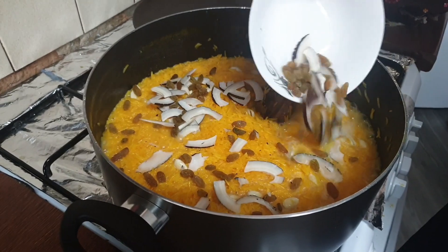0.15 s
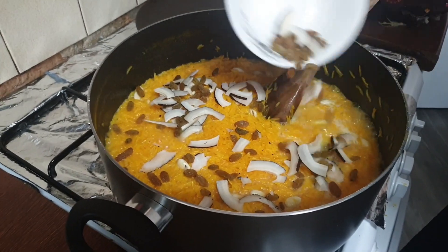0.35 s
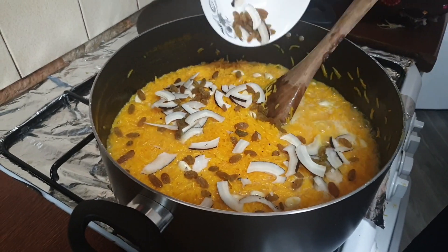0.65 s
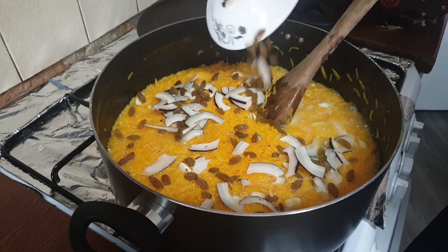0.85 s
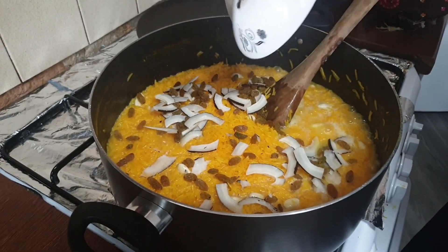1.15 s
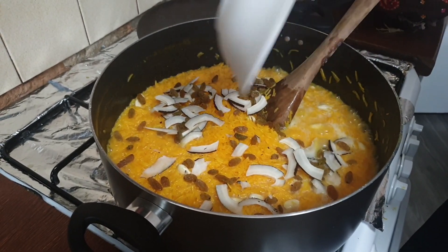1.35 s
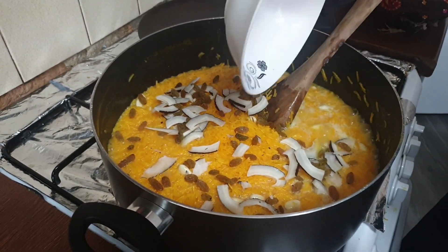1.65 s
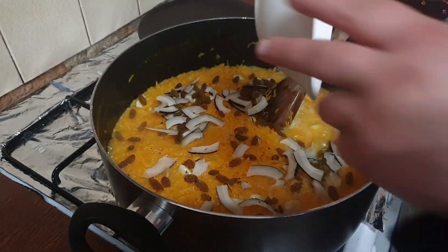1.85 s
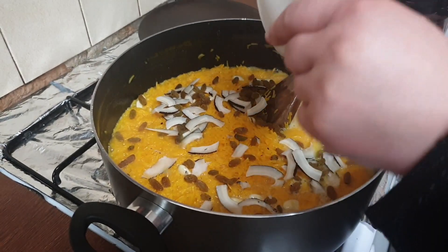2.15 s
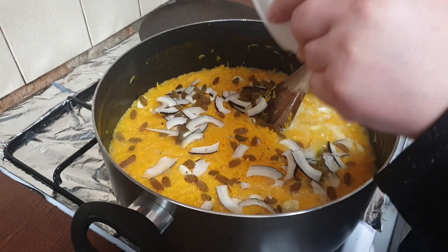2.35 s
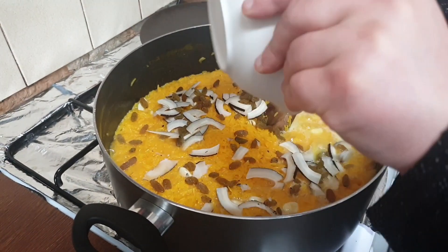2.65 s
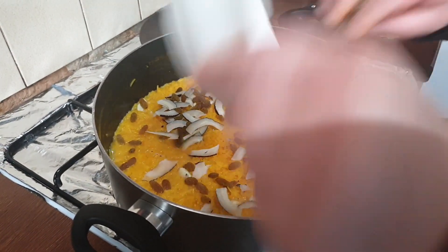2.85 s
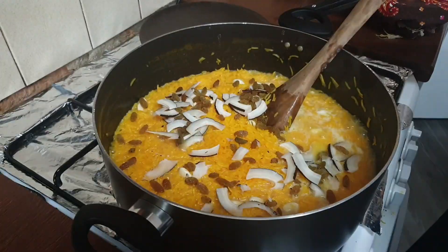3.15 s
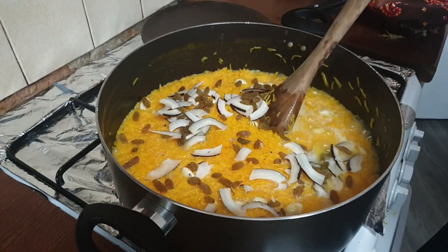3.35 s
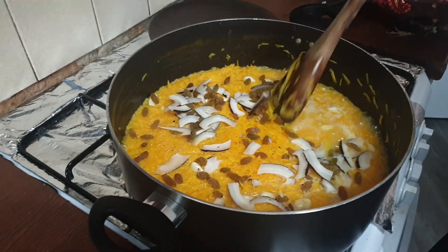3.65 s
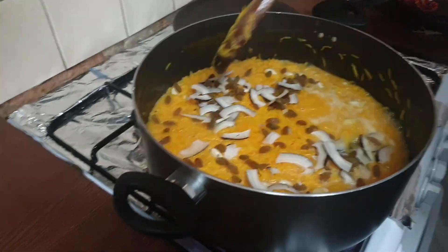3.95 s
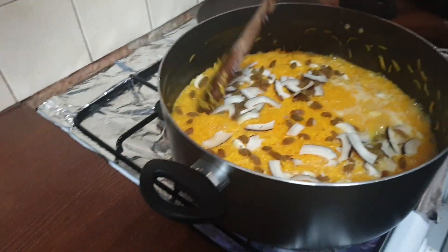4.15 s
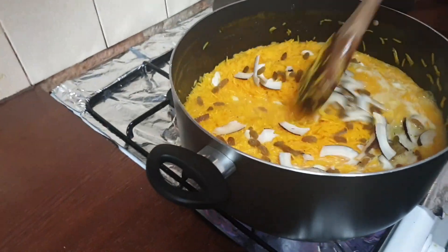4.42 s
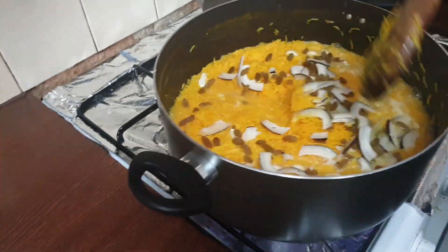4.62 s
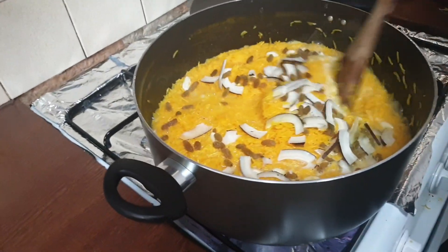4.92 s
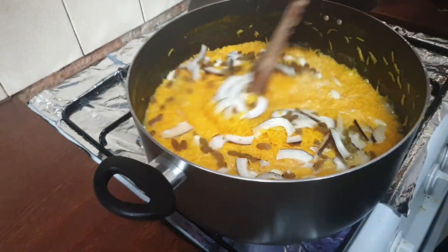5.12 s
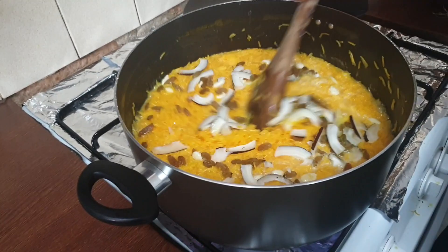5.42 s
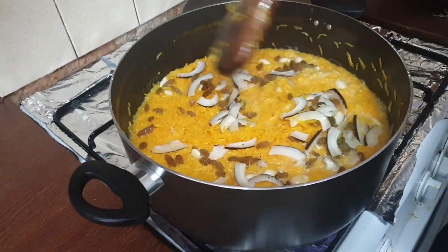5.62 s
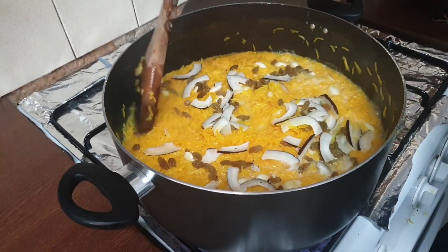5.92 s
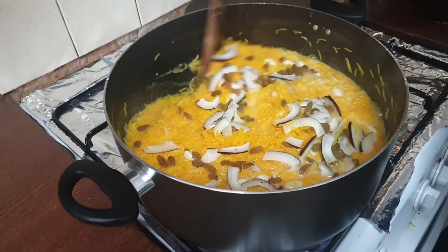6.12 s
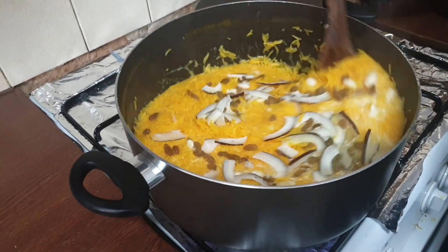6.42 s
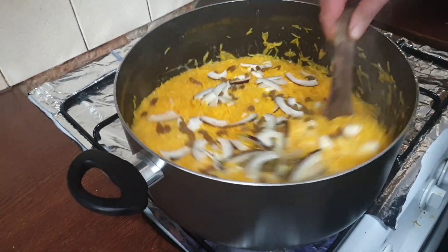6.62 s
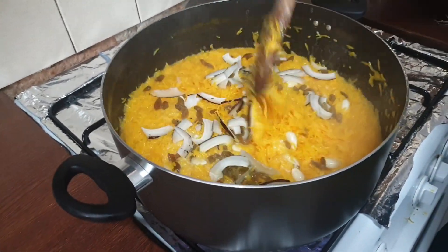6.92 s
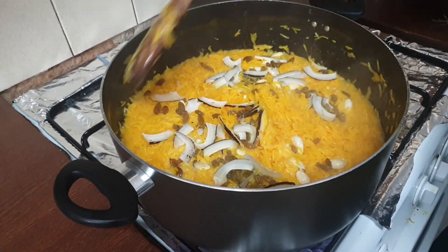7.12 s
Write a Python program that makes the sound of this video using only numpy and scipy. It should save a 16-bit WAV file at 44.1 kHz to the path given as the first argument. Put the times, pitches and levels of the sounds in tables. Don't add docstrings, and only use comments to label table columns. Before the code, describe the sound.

A close stereo microphone hears a pot of rice bubbling steadily, with rounded plops and crisp spitting above a soft flame rumble. After four seconds a wooden spoon cracks against the ringing metal, pushes through the wet rice, thuds the pot on its grate and scrapes it. Later strokes turn mushy and crunchy, then simmering remains. Short kitchen echoes.

```python
import sys
import numpy as np
from scipy import signal
from scipy.fft import rfft, irfft
from scipy.io import wavfile
from scipy.ndimage import uniform_filter1d

SR = 44100
rng = np.random.default_rng(int(sys.argv[2]) if len(sys.argv) > 2 else 0)


def voltage_ratio(decibels):
    exponent = np.asarray(decibels, float) / 20
    return 10 ** exponent


def waveform_to_disk(signal):
    frames = np.transpose(np.atleast_2d(signal))
    scaled = np.clip(frames, -1, 1) * 32767
    samples = np.round(scaled).astype(np.int16)
    wavfile.write(sys.argv[1], SR, samples)


N = 320871
T = np.arange(N) / SR


def evened(x):
    return x / np.sqrt(np.mean(x ** 2) + 1e-20)


def read(points, hz):
    point_hz, value = np.transpose(points)
    return np.interp(np.log(hz + 1), np.log(point_hz + 1), value)


def add(mix, s, sound):
    part = mix[round(s * SR):][:len(sound)]
    part += sound[:len(part)]


def coloured(x, points):
    gain_db = np.maximum(read(points, abs(np.fft.fftfreq(4096, 1 / SR))), -90)
    log_gain = np.log(voltage_ratio(gain_db))
    min_phase = np.exp(np.conj(signal.hilbert(log_gain)))
    taps = np.fft.ifft(min_phase).real[:2048]
    return signal.oaconvolve(x, taps / np.linalg.norm(taps))[:len(x)]


def resonate(x, hz, width_hz):
    turn = np.exp(2j * np.pi * np.cumsum(hz * np.ones(len(x))) / SR)
    r = np.exp(-np.pi * width_hz / SR)
    smooth = signal.lfilter([1 - r], [1, -r], x / turn)
    return 2 * (turn * smooth).real


def grains(per_s, spread_db):
    sign = np.sign(rng.standard_normal(N))
    size_db = spread_db * np.minimum(rng.exponential(1, N), 4)
    hit = rng.random(N) < per_s / SR
    return evened(sign * voltage_ratio(size_db) * hit)


LEAD_S = 0.00019


def lag(hz):
    return np.exp(-1j * np.minimum(2 * np.pi * LEAD_S * hz, np.pi / 2))


# frequency in Hz, left-right likeness 0-1.
LIKENESS = [(60, 0.95), (130, 0.94), (290, 1), (640, 0.67), (1410, 0.51), (3100, 0.4), (6820, 0.14),
            (15000, 0.18)]


def wash(points, patchy_db, flicker_db, size):
    frames, hz = 4 * N // size + 5, np.fft.rfftfreq(size, 1 / SR)
    a, b, c, d, patches = rng.standard_normal((frames, len(hz), 5)).T
    patches = evened(uniform_filter1d(uniform_filter1d(patches, 8, 0), 10, 1))
    flicker = evened(uniform_filter1d(rng.exponential(1, frames) - 1, 3))
    same = np.clip(read(LIKENESS, hz), 0, 1)[:, None]
    left = a + 1j * b
    right = (same * left + np.sqrt(1 - same ** 2) * (c + 1j * d)) * lag(hz)[:, None]
    level_db = read(points, hz)[:, None] + patchy_db * patches + flicker_db * flicker
    z = np.array([left, right]) * voltage_ratio(level_db)
    return evened(signal.istft(z, nperseg=size, noverlap=3 * size // 4)[1][:, :N])


# resonance in Hz, width in Hz, level in dB.
BOWL_MODES = [(310, 24, 2), (569, 53, -3.5), (876, 79, -1), (1288, 82, -2)]


def bowl(x):
    ring = sum(voltage_ratio(db) * resonate(x, hz, width_hz) for hz, width_hz, db in BOWL_MODES)
    return evened(x + ring) * np.std(x)


# frequency in Hz, level in dB per Hz.
FIZZ_SPECTRUM = [(1470, -25), (2500, -4.5), (3410, -8), (5480, -6.5), (6600, -17.5), (7130, -15),
                 (7770, -24), (8140, -23), (8730, -14), (10600, -4), (14000, -3.5), (15000, -5),
                 (16000, -40)]
# frequency in Hz, level in dB.
GURGLE_SPECTRUM = [(150, -23), (300, -2), (550, -1), (900, -4), (1500, -8), (2400, -8), (3200, -19.5),
                   (5000, -33)]
# frequency in Hz, level in dB.
RUMBLE_SPECTRUM = [(25, -45), (36, -32), (52, 5), (80, 1.5), (150, 0.5), (250, -6.5), (400, -11),
                   (800, -45)]
# time in seconds, level in dB.
BOIL_DB = [(0, -3.5), (.9, 1), (2.1, 0), (2.7, -0.5), (3, 1.5), (3.9, 1.5), (5.1, -0.5), (6.1, 0.5),
           (6.75, 2.5), (6.95, -6), (7.28, -3.5)]
# peak in seconds, rise over the boil in dB, rise in s, fall in s.
HEAVES = [
    (3.98, 13, 0.044, 0.18),
    (4.6, 6, 0.22, 0.079),
    (5.47, 10.5, 0.14, 0.13),
    (5.84, 6.5, 0.45, 0.21),
    (6.61, 7, 0.23, 0.08),
]
FIZZ_DB, GURGLE_DB, RUMBLE_DB = -55.5, -49, -48.5
FIZZ_FOLLOWS, RUMBLE_FOLLOWS = 0.42, 0.2


def simmer():
    boil_db = np.interp(T, *np.transpose(BOIL_DB))
    for s, db, rise_s, fall_s in HEAVES:
        swell = np.minimum(1 + (T - s) / rise_s, 1 - (T - s) / fall_s)
        boil_db = boil_db + db * np.clip(swell, 0, 1)
    fizz = voltage_ratio(FIZZ_DB + FIZZ_FOLLOWS * boil_db) * wash(FIZZ_SPECTRUM, 1.6, 0.98, size=256)
    ports = wash(GURGLE_SPECTRUM, 2.57, 1.74, size=512)
    gurgle = voltage_ratio(GURGLE_DB + boil_db) * np.array([bowl(port) for port in ports])
    rumble = voltage_ratio(RUMBLE_DB + RUMBLE_FOLLOWS * boil_db) * wash(RUMBLE_SPECTRUM, 2.4, 0.95, size=2048)
    return fizz + gurgle + rumble


# start in seconds, peak in dB, pitch in Hz, splash in dB.
PLOPS = [(.074, -37, 318, -2.5), (.202, -35, 900, -5), (.322, -31.5, 322, -6), (.454, -34.5, 870, -24),
         (.546, -43, 600, -11), (.800, -31.5, 824, -9), (.941, -30, 553, 0), (1.1, -39, 310, -7),
         (1.119, -30.5, 546, -24), (1.244, -44, 557, -16), (1.312, -29, 292, -4.5), (1.357, -32, 970, -21),
         (1.662, -43.5, 354, 11), (1.719, -36, 550, -17), (1.803, -40, 342, -19), (1.993, -34.5, 870, -27),
         (2.08, -35, 860, -10), (2.246, -38, 886, -19), (2.408, -36.5, 296, -21), (2.696, -37.5, 566, -19),
         (2.85, -41, 527, -9), (2.897, -34, 325, -18), (3.219, -29.5, 366, -18), (3.267, -47, 410, -14),
         (3.366, -39, 876, -15), (3.501, -34, 310, -21), (3.625, -37.5, 312, 4), (3.758, -42, 552, -16),
         (3.8, -44, 552, -14), (3.928, -34, 514, -20)]
# start in seconds, peak in dB, pitch in Hz, splash in dB.
SUCKS = [(4.37, -32, 374, -21), (4.678, -31.5, 306, -17), (4.752, -33, 366, -25), (5.942, -36, 465, -13),
         (6.052, -34, 300, 2), (6.227, -32.5, 550, -11), (6.301, -34, 695, -20), (6.348, -27.5, 720, -27),
         (6.431, -27.5, 584, -24), (6.555, -43, 850, -17), (6.747, -32, 1210, 2.5), (6.943, -36, 466, -15),
         (5.215, -42.5, 420, 9.5)]
# frequency in Hz, level in dB.
SPLASH_SPECTRUM = [(800, -5), (1400, -8), (2200, -8), (2900, -10), (3600, -23), (6000, -36)]
PLOP_T60_S, SUCK_T60_S = 0.045, 0.038


def plops():
    out, slop, splash = np.zeros((3, N))
    t = T[:5000]
    rows = [(*row, PLOP_T60_S) for row in PLOPS] + [(*row, SUCK_T60_S) for row in SUCKS]
    noise = rng.standard_normal((len(rows), len(t)))
    for (s, db, hz, splash_db, t60_s), puff in zip(rows, noise):
        shape = voltage_ratio(db - 60 * t / t60_s) * np.minimum(t / 0.0051, 1)
        add(out, s, voltage_ratio(-3.5) * shape * np.sin(2 * np.pi * hz * t * (1 + 3.5 * t)))
        add(slop, s, voltage_ratio(-2.5) * shape * puff)
        add(splash, s, voltage_ratio(splash_db - 2) * shape * puff[::-1])
    slop += voltage_ratio(-62) * grains(300, 7.9)
    return out + bowl(coloured(slop, GURGLE_SPECTRUM)) + coloured(splash, SPLASH_SPECTRUM)


# start in seconds, peak in dB.
SPITS = [(0.21, -35), (.357, -42), (0.468, -43), (.555, -41.5), (0.637, -39.5), (0.68, -34.5), (.771, -40),
         (0.819, -31.5), (0.945, -28), (1.332, -40), (1.664, -41), (1.946, -41.5), (2.329, -39),
         (2.409, -36), (2.478, -41), (2.611, -41), (2.670, -35.5), (3.237, -36), (3.593, -43),
         (3.723, -33.5), (4.328, -36), (4.772, -39), (5.315, -47), (5.778, -47), (6.126, -41), (6.3, -32.5),
         (6.455, -38.5), (6.611, -36), (6.75, -32.5), (7.147, -54)]
SPRAY_T60_S = 0.055


def spits():
    out, t = np.zeros(N), T[:4000]
    noise = rng.standard_normal((len(SPITS), len(t)))
    for (s, db), puff in zip(SPITS, noise):
        add(out, s, voltage_ratio(db - 7.5 - 60 * t / SPRAY_T60_S) * puff * np.minimum(t / 0.00022, 1))
    out += voltage_ratio(-67.5) * grains(120, 10.0)
    return coloured(out, FIZZ_SPECTRUM)


POT_HZ = [129, 168, 195, 413, 590, 740, 870, 1170, 1707, 1868, 1970, 2326, 3047, 3295, 3862, 4500, 4953,
          5157, 5712, 5862, 6880, 9310, 10500, 11470, 12030, 13430, 14170, 14925, 15270]
# t60 in seconds, dB struck low, dB struck on the wall, dB scraped.
POT_MODES = [(0.22, 0.5, -20, -27), (0.36, -8, -32, -37), (0.2, -24, -42, -35), (0.35, -13, -5, -7),
             (0.37, -30, -15, -30), (0.076, -20, -0.5, -25), (0.33, -30, -4, -10), (0.024, 6.5, -26, -37.5),
             (0.61, -24, -12, -9), (0.18, -19, -1.5, -6), (0.2, -12, 6.5, -24.5), (0.32, -6, 4.5, -10.5),
             (0.3, -28, -19, -19), (0.35, -34, -1, -29.5), (0.24, -17, -10, -29), (0.16, -9, -34, -43),
             (0.22, -24, -7, -39), (0.21, -16, -11, -38), (0.17, -17, -6, -17), (0.056, -5, -28, -39),
             (0.12, -26, -10, -40), (0.27, -20, -25, -12.5), (0.12, -36, -36, -35), (0.2, -32, -8, -24),
             (0.12, -14, 4, -32.5), (0.35, -27, -2, -6), (.3, -32, -17, -15), (0.41, -21, -16, -9),
             (.3, -31, -24, -30)]
# start in seconds, ring in dB, share on the wall 0-1,
# dulling by rice in dB per octave, crack above ring in dB.
KNOCKS = [
    (3.958, -41.5, 0.26, 3.5, 20),
    (3.960, -20.5, 0, -1.5, 12),
    (4.033, -37, 0.5, -0.5, 10.5),
    (4.181, -42, 0.8, -3.5, 2.5),
    (4.232, -33.5, 0.52, -4, 0),
    (4.546, -39, 0.6, -5.5, 15.5),
    (4.558, -45.5, 0.1, -5, 19),
    (4.772, -41.5, 0.11, -7, 9),
    (5.447, -39, 0.92, 0, 12),
    (5.642, -41.5, 0.8, 0, 4.5),
]
# frequency in Hz, level in dB per Hz.
CRACK_SPECTRUM = [(100, -16), (300, -0.5), (850, -2.5), (1200, -2), (2400, -3.5), (4400, -15),
                  (5800, -12.5), (7800, -30), (9000, -24.5), (13000, -10.5), (16000, -51)]
CRACK_T60_S, CRACK_T60_WALL_S, CRACK_T60_DULL_S = 0.0088, 0.078, 0.0039
STRIKE_DB = 4


def knocks():
    out, t, hz = np.zeros(N), T[:SR // 2], np.array(POT_HZ)[:, None]
    t60_s, low_db, wall_db, _ = np.transpose(POT_MODES)[:, :, None]
    chance = rng.standard_normal((len(KNOCKS), len(t) + len(POT_MODES)))
    for (s, db, wall, dull_db, crack_db), row in zip(KNOCKS, chance):
        noise, sign = row[:len(t)], np.sign(row[len(t):, None])
        place_db = (1 - wall) * low_db + wall * wall_db
        start_db = db + place_db + dull_db * np.log2(np.maximum(hz / 400, 1))
        modes = voltage_ratio(start_db - 60 * t / t60_s) * np.sin(2 * np.pi * hz * t) * sign
        add(out, s, (modes * np.minimum(t * hz / 0.39, 1)).sum(0))

        crack_t60_s = CRACK_T60_S + CRACK_T60_WALL_S * wall - CRACK_T60_DULL_S * min(dull_db, 0)
        burst = voltage_ratio(db + crack_db - 60 * t / crack_t60_s) * noise * np.minimum(t / 0.00082, 1)
        burst[20] -= voltage_ratio(db + crack_db + STRIKE_DB) * (1 - wall)
        dulled = [(f, g + dull_db * np.log2(max(f / 400, 1))) for f, g in CRACK_SPECTRUM]
        add(out, s, coloured(burst, dulled))
    return out


# start in seconds, length in seconds, time of most push 0-1,
# drag in dB, hollow in the rice in Hz.
STROKES = [
    (4.062, .5, 0.85, -34.5, 373),
    (5.025, 0.19, 0.4, -36.5, 443),
    (5.63, .1, .3, -38, 446),
    (5.695, 0.31, 0.16, -40.5, 416),
    (6.04, 0.11, 0.5, -44.5, 314),
    (6.286, 0.23, 0.7, -40, 523),
    (6.48, 0.25, 0.3, -49, 430),
]
# start in seconds, length in seconds, singing in dB, wet crush in dB.
SCRAPES = [
    (4.046, 0.47, -59.5, -62),
    (4.9, 0.28, -95, -77),
    (5.445, 0.19, -59, -65),
    (5.637, 0.11, -51.5, -64),
    (5.717, .17, -49, -50),
    (5.848, 0.19, -58.5, -47.5),
    (6.2, .25, -85, -54),
    (6.438, 0.43, -78, -46.5),
]
EASE_DB, HOLLOW_SAG, UPPER_DB = -5, 0.35, -7


def strokes():
    drag_gain, sing_gain, crush_gain = np.zeros((3, N))
    hollow_hz = np.full(N, 350.0)
    for s, length_s, top, db, hz in STROKES:
        u = (T - s) / length_s
        push = np.clip(np.minimum(u / top, (1 - u) / (1 - top)), 0, 1)
        gain = voltage_ratio(db + EASE_DB * (1 - push)) * np.clip(np.minimum(u, 1 - u) / 0.03, 0, 1)
        hollow_hz = np.where(gain > drag_gain, hz * (1 - HOLLOW_SAG * (1 - push)), hollow_hz)
        drag_gain = np.maximum(gain, drag_gain)
    for s, length_s, sing_db, crush_db in SCRAPES:
        u = (T - s) / length_s
        touch = np.clip(np.minimum(u, 1 - u) / 0.25, 0, 1)
        sing_gain = sing_gain + voltage_ratio(sing_db) * touch
        crush_gain = crush_gain + voltage_ratio(crush_db) * touch

    slips = grains(2500, 3.3)
    hollow = evened(resonate(resonate(slips, hollow_hz, 170), hollow_hz, 280))
    overtone = evened(resonate(slips, 1.18 * hollow_hz, 170))
    slop = evened(coloured(slips, GURGLE_SPECTRUM))
    drag = evened(hollow + voltage_ratio(UPPER_DB) * overtone + 0.19 * slop)

    rub = grains(3000, 4.5)
    sing = np.zeros(N)
    for hz, (t60_s, _, _, db) in zip(POT_HZ, POT_MODES):
        width_hz = 2.2 * 2.3 / t60_s
        sing += voltage_ratio(db) * evened(resonate(rub, hz, width_hz))
    crush = evened(coloured(grains(5000, 2.5), FIZZ_SPECTRUM))
    return voltage_ratio(-7.5) * drag_gain * drag + voltage_ratio(2.5) * sing_gain * sing + voltage_ratio(-9.5) * crush_gain * crush


# start in seconds, level in dB, pitch in Hz, t60 in seconds.
THUDS = [
    (4.546, -24, 129.2, 0.17),
    (4.547, -25.5, 412.8, 0.23),
    (4.549, -35, 853, 0.2),
    (4.558, -18, 859, 0.043),
    (4.557, -25, 114, 0.17),
    (4.773, -30.5, 163.5, 0.24),
    (4.772, -28, 404, 0.11),
    (4.774, -45, 740, 0.21),
    (4.819, -35, 94.8, 0.36),
]


def thuds():
    out, t = np.zeros(N), T[:SR // 2]
    for s, db, hz, t60_s in THUDS:
        add(out, s, voltage_ratio(db - 60 * t / t60_s) * np.sin(2 * np.pi * hz * t) * np.minimum(t * hz, 1))
    return out


# frequency in Hz, t60 in seconds.
KITCHEN_T60_S = [(100, 0.46), (500, 0.31), (2000, 0.26), (8000, 0.26), (15000, 0.019)]


def kitchen(x, wet_db):
    direct = np.array([x, irfft(rfft(x) * lag(np.fft.rfftfreq(N, 1 / SR)), N)])
    taps = np.zeros((2, SR // 2))
    at = np.arange(40, SR // 2 - 20, 20) + rng.integers(0, 20, (2, (SR // 2 - 41) // 20))
    np.put_along_axis(taps, at, rng.choice([-1., 1.], at.shape), 1)
    hz, t, z = signal.stft(taps, SR, nperseg=256)
    same = np.clip(read(LIKENESS, hz), 0, 1)[:, None]
    z[1] = same * z[0] + np.sqrt(1 - same ** 2) * z[1]
    decay = voltage_ratio(-60 * t / read(KITCHEN_T60_S, hz)[:, None])
    tail = signal.istft(z * decay, SR, nperseg=256)[1]
    echoes = signal.fftconvolve(x[None], tail / np.linalg.norm(tail[0]), axes=1)[:, :N]
    return direct + voltage_ratio(wet_db) * echoes


def scene():
    rice = kitchen(plops() + spits() + strokes(), -5)
    pot = kitchen(knocks() + thuds(), -7)
    return simmer() + rice + pot


def band_limit(x):
    return signal.sosfilt(signal.butter(12, 15810, fs=SR, output="sos"), x)


# frequency in Hz, left minus right in dB.
PORTS_DB = [(60, 2.5), (200, 2), (330, -0.5), (550, 4.5), (1200, 4.5), (2000, 0.5), (3100, 1), (5000, -3),
            (7000, -2), (8600, 7.5), (10500, 1.5), (12000, 7), (13100, 15), (15200, 16)]


def record(dry):
    hz = np.fft.rfftfreq(N, 1 / SR)
    tilt_db = read(PORTS_DB, hz) / 2
    low_cut = 1 / (1 + (38 / (hz + 1)) ** 4)
    heard = irfft(rfft(dry) * low_cut * voltage_ratio(np.array([tilt_db, -tilt_db])), N)
    return band_limit(heard)


dry = scene()
out = record(dry)
waveform_to_disk(out)
```